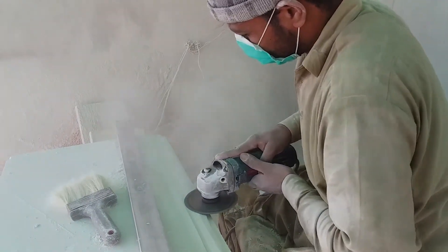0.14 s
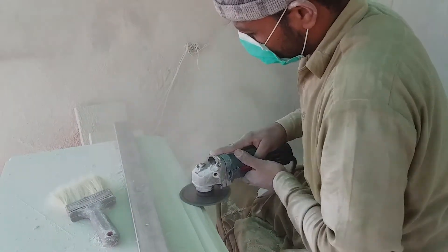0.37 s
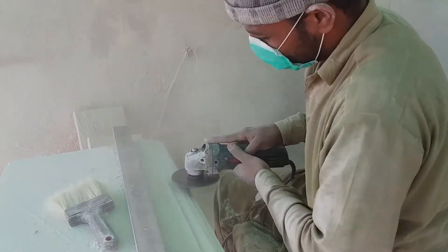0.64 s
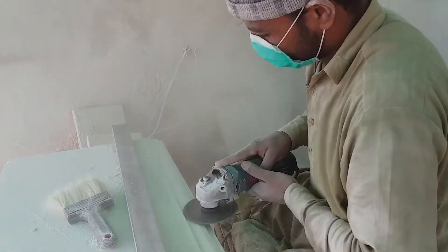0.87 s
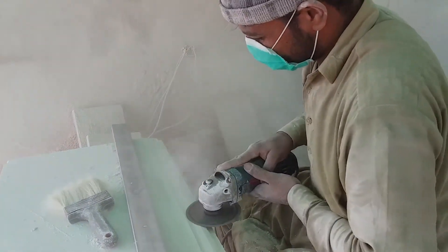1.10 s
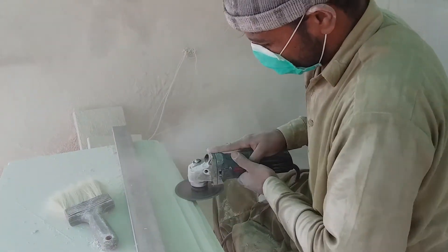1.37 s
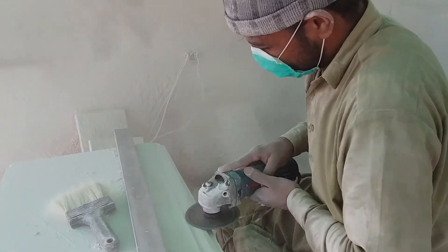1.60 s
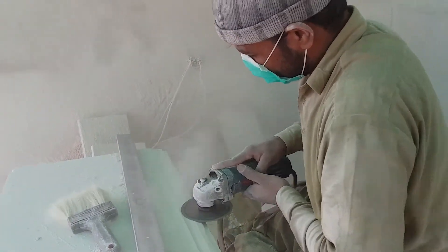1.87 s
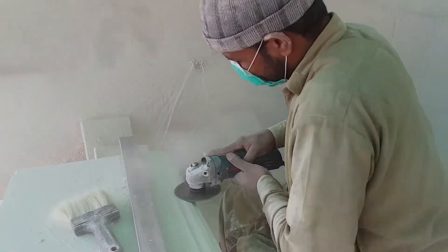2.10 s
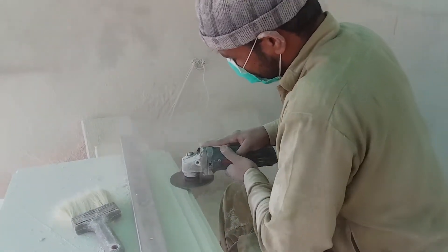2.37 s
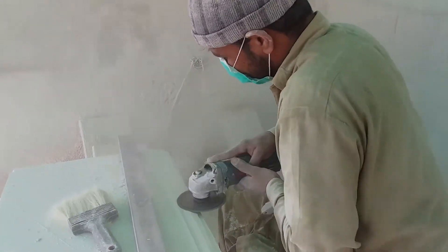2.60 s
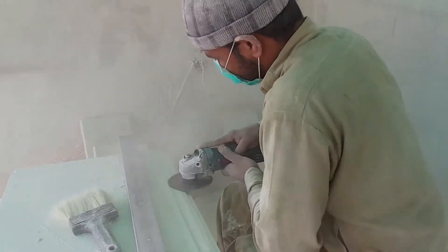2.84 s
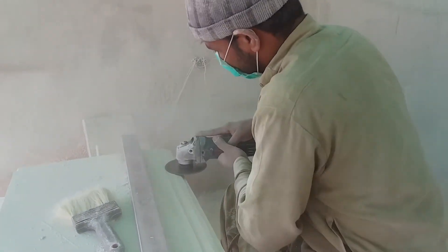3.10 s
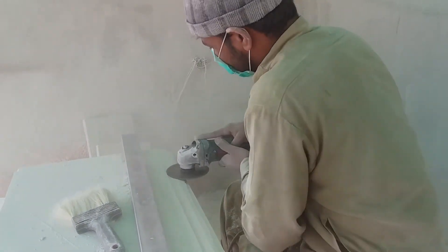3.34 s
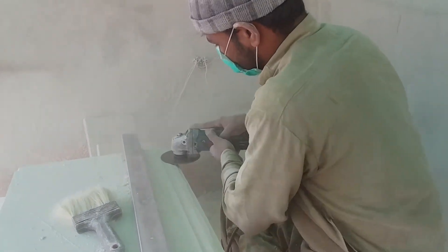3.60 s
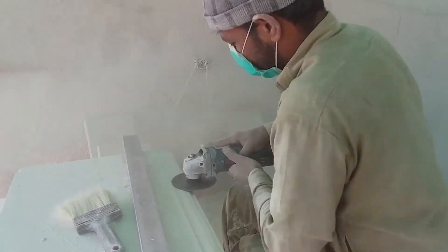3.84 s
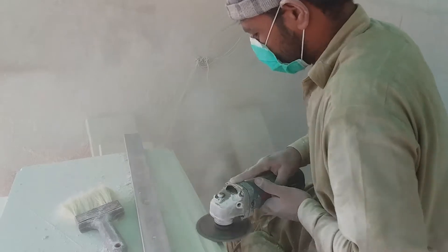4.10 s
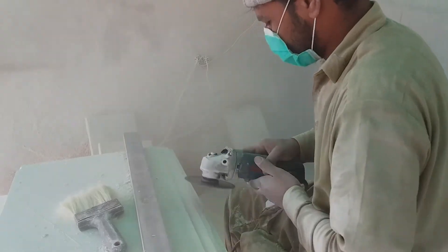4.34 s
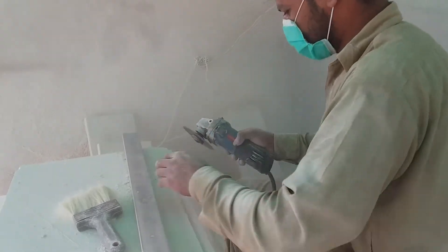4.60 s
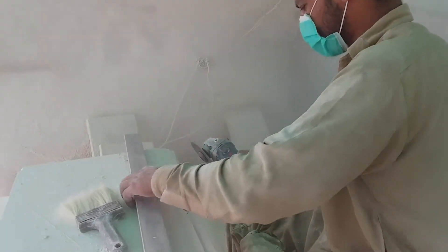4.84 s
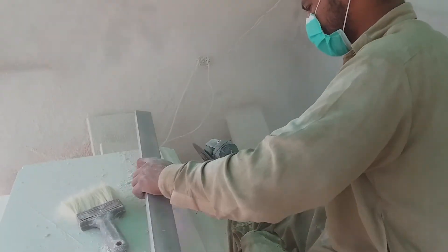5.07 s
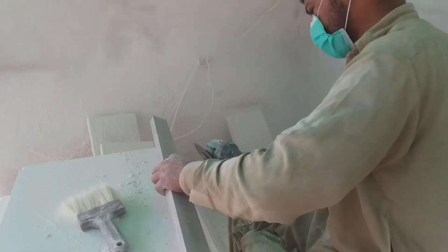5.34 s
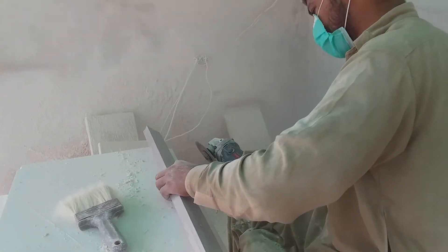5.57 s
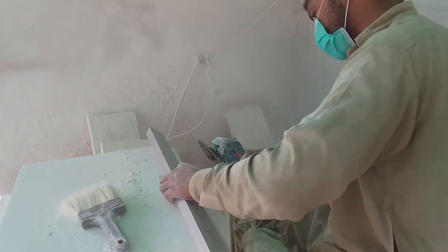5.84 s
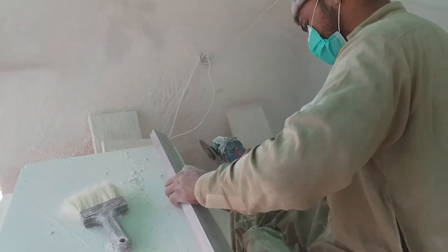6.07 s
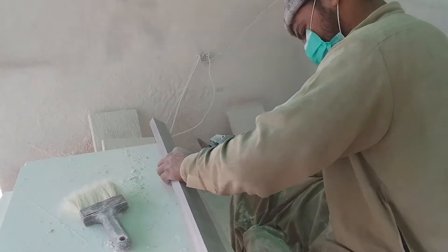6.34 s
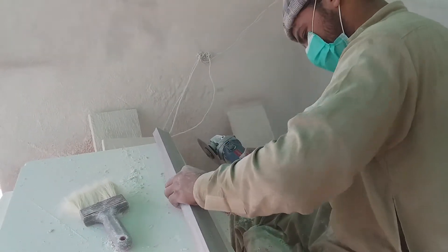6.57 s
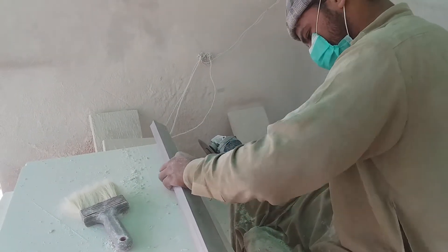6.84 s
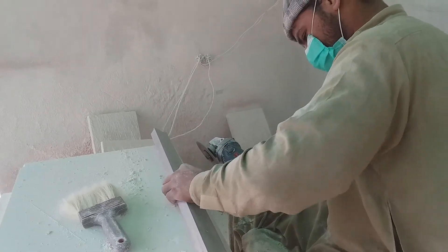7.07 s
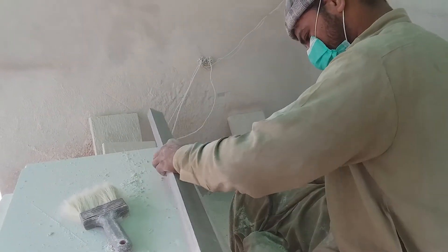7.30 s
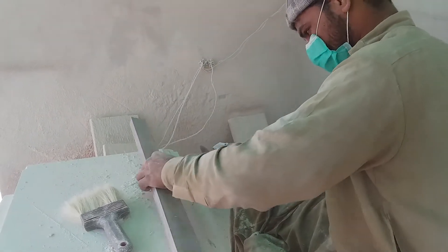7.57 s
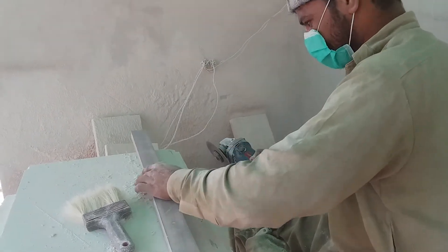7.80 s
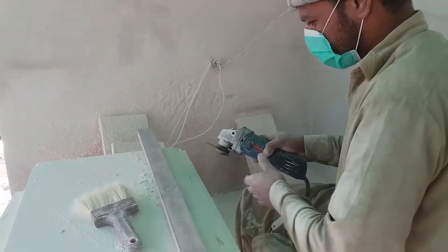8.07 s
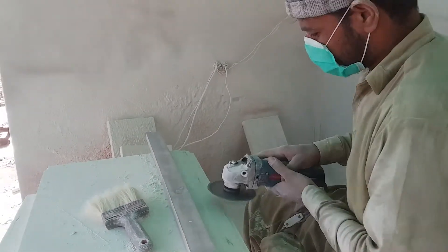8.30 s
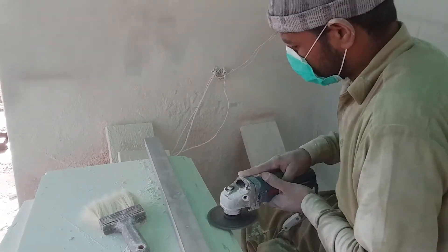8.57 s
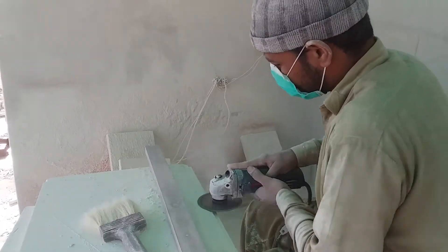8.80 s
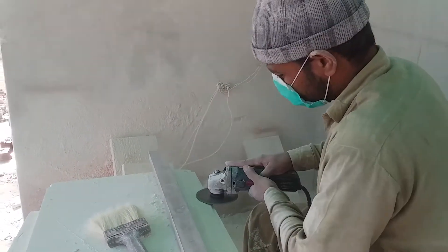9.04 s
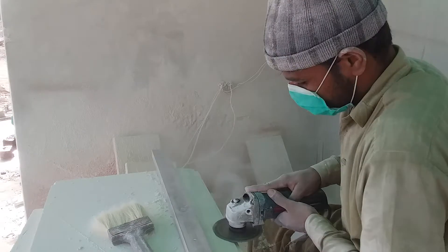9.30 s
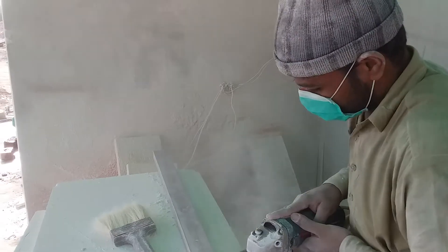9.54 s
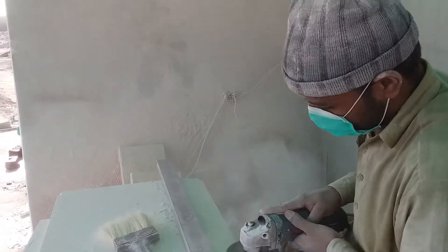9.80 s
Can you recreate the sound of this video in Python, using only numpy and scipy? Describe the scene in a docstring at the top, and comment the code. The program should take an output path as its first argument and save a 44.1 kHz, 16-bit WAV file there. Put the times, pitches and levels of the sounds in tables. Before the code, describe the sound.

A close, centered microphone in a bare workshop hears a handheld angle grinder already biting stone: low rattling slab shake, coarse grit spray, small thuds and a piercing steel-disc ring. The first bite ends about 0.6 s; another runs from 0.95 to 1.4. From 1.65 further passes run together, growing lighter and more whistling after 3, until about 4.15 s. Fan rush and a wavering motor whine continue throughout, rising in pitch as the load lifts. The idle is soft at first, then from about 5.5 s swells clearly louder, with bright hiss, thin high ticks and a faint low rumble. A hollow metal bar knocks dully near 5.6 and drags faintly around 6.3, 7.15 and 7.7, with a small knock at 8.4. At 8.6 the disc bites again, the motor sags in pitch, and harsh, ringing, gritty cutting with thuds lasts until about 9.9.

```python
"""A hand-held angle grinder is already biting a stone slab; it bites again and again, then idles,
heard softly at first and then louder, while a hollow metal bar is shifted, and at last cuts on.
Each bite is noise shaped into slab shake, sprayed grit and the ringing steel disc.
Fan rush (shaped noise) and armature whine (wandering sines) never stop; thin ticks and a low rumble join them.
One microphone stands close by in a bare workshop, so left and right are the same."""
import sys
import numpy as np
from scipy import signal
from scipy.fft import rfft, irfft, next_fast_len
from scipy.io import wavfile
from scipy.ndimage import uniform_filter1d, map_coordinates

SR = 44100
rng = np.random.default_rng(int(sys.argv[2]) if len(sys.argv) > 2 else 0)


def amp(db):
    return 10 ** (np.asarray(db, float) / 20)


def write(x):
    x = np.atleast_2d(x).T
    wavfile.write(sys.argv[1], SR, np.round(np.clip(x, -1, 1) * 32767).astype(np.int16))


N = 437472  # length in samples
T = np.arange(N) / SR  # time in seconds
SIZE = next_fast_len(N)
HZ = np.arange(SIZE // 2 + 1) * SR / SIZE  # frequencies of the spectrum

# How loud the motor noise is heard before load and flutter are added.
# Each row: time in seconds, rush level in dB, hiss level in dB, thin top hiss level in dB.
MOTOR_LEVELS = [(0, -28.5, -28.5, -53), (1.6, -28, -30, -51.5), (2.4, -28.5, -28, -44),
                (4.12, -28, -29, -44), (4.25, -26.5, -26, -48), (4.6, -27.5, -27.5, -51),
                (5.22, -25, -28, -53), (5.5, -20, -21.5, -45.5), (5.62, -16.5, -19, -44.5),
                (5.8, -18, -18.5, -43.5), (6.3, -16.5, -18.5, -43), (7.45, -18.5, -18.5, -44),
                (7.8, -16.5, -18, -44), (8.07, -20.5, -18, -41.5), (8.37, -17, -18, -39.5),
                (8.615, -18, -17, -39), (8.645, -25.5, -26.5, -40.5), (9.8, -28, -28.5, -48.5),
                (9.92, -29, -32, -55)]


def cutting():
    """The rim chatters on the stone: jolts shake the slab, grit sprays, and each disc mode swells on its own."""
    shake_db, ring_db, load_db = passes()
    shake = uniform_filter1d(amp(shake_db + 0.7 * walk(25)), size=200)
    ring = uniform_filter1d(amp(ring_db), size=200)
    # pressing harder adds a little grit; below the lightest contact it fades with the shake
    lightest_spray_db, gain_per_shake_db = -27, 0.24
    spray_db = lightest_spray_db + gain_per_shake_db * np.clip(load_db, 0, None)
    spray_db = spray_db + np.clip(load_db, None, 0) + 0.85 * walk(15)
    spray = uniform_filter1d(amp(spray_db), size=200)
    chatter = walk(35)  # shared by slab and grit
    slab = slab_shake(shake, chatter)
    grit = rng.standard_normal(N) * amp(1.5 * walk(300) + 0.8 * chatter)
    low, high = disc_and_grit(grit, shake, ring)
    return slab + ring * low + spray * high


def passes():
    """Slab shake and disc ring (dB), and how far the shake lies above the lightest contact; silent between passes."""
    # Passes of the disc along the edge, one curve each, before small wavers and trims.
    # Each row: time in seconds, slab shake in dB, disc ring in dB.
    pass_curves = [
        [(0.0, -19, -25), (0.028, -16.5, -17.5), (0.188, -20.5, -17.5), (0.234, -23, -21), (0.274, -21.5, -24),
         (0.316, -22, -19.5), (0.434, -21, -18), (0.554, -37.5, -21), (0.58, -62, -37)],
        [(0.94, -40.5, -30), (1.13, -18.5, -18.5), (1.154, -23, -18.5), (1.232, -18.5, -20), (1.25, -21, -17),
         (1.276, -18.5, -19), (1.344, -29, -18.5), (1.394, -40, -25), (1.43, -62, -45)],
        [(1.65, -49, -41), (1.664, -34.5, -28), (1.802, -22, -20), (1.832, -29, -21), (1.862, -22, -23),
         (1.938, -25.5, -18), (2.014, -21.5, -20), (2.118, -22, -21.5), (2.33, -36, -19)],
        [(2.33, -43.5, -22), (2.516, -26.5, -18.5), (2.662, -26, -21), (2.708, -22.5, -18), (2.742, -19.5, -29),
         (2.788, -26.5, -20), (2.814, -22, -18), (3.028, -33.5, -20), (3.07, -39, -22)],
        [(3.07, -40, -23), (3.252, -32.5, -20.5), (3.298, -38, -19.5), (3.36, -30, -22), (3.724, -36, -18),
         (3.778, -30.5, -19), (4.096, -25.5, -15.5), (4.142, -28, -26), (4.18, -57, -38)],
        [(8.625, -31, -16), (8.667, -25, -13.5), (8.967, -30.5, -17), (9.309, -23.5, -15.5), (9.399, -26, -12),
         (9.449, -19, -20), (9.499, -25.5, -18.5), (9.813, -22, -17.5), (9.92, -52, -24)],
    ]
    lightest_contact_db = -43.5
    curves = [columns(curve, outside=-200) for curve in pass_curves]
    shake_db, ring_db = (np.max(together, axis=0) for together in zip(*curves))
    return shake_db, ring_db, shake_db - lightest_contact_db


def slab_shake(shake, chatter):
    """Uneven jolts pass through the slab's tone colour and a wobble resonance, and single thuds are added."""
    # Tone colour of the shaken slab. Each row: frequency in Hz, relative level in dB per Hz.
    slab_colour = [(15, -52), (30, -17), (76, -1.5), (156, -4.5), (381, -2.5), (493, -1.5), (769, -5),
                   (1500, -9.5), (1950, -13), (3300, -120)]
    # Disc wobble once a turn under load: frequency in Hz, width in Hz, level in dB over the slab noise.
    spindle_wobble = (150, 42, 6.9)
    wobble_hz, wobble_width, wobble_db = spindle_wobble
    jolts = rng.standard_normal(N) * amp(2.4 * walk(160) + 0.7 * chatter)
    wobble = 1 + amp(wobble_db) * np.abs(mode(wobble_hz, wobble_width))
    noise = banded(shaped(jolts, colour(slab_colour) * wobble), 60, 400)
    return amp(-0.5) * shake * noise + thuds(shake)


def thuds(shake):
    """Short damped knocks of the rim on the stone: the marked ones, and lesser ones that follow the shake."""
    # The rim meets the stone or snags in the cut.
    # Each row: start in seconds, level in dB before the decay, thud pitch in Hz.
    marked_touches = [(0.945, -21, 471), (1.229, -9, 240), (1.654, -28, 530), (1.782, -9, 231),
                      (1.958, -14, 353), (2.028, -6, 280), (2.749, -10, 520), (2.799, -15, 303),
                      (8.63, -11.5, 455), (8.83, -26, 323), (9.105, -11, 223), (9.293, -5, 322),
                      (9.341, -18, 202), (9.456, -18, 350), (9.684, -8, 248), (9.8, -14, 460)]
    snags_per_s, loudest_snag_db = 30, 5  # dB over the slab shake
    lowest_hz, highest_hz = 150, 500  # snag pitch
    decay_s = 0.004
    chance = rng.random((int(snags_per_s * N / SR), 3))
    at = (chance[:, 0] * (N - 1)).astype(int)
    snag_gain = shake[at] * amp(loudest_snag_db - 10 * chance[:, 1])
    snag_hz = lowest_hz * (highest_hz / lowest_hz) ** chance[:, 2]
    marked = [(int(s * SR), amp(db), hz) for s, db, hz in marked_touches]
    out, after = np.zeros(N + 1500), T[:1500]
    for i, gain, hz in [*marked, *zip(at, snag_gain, snag_hz)]:
        out[i:i + len(after)] += gain * np.exp(-after / decay_s) * np.sin(2 * np.pi * hz * after)
    return out[:N]


def disc_and_grit(grit, shake, ring):
    """Grit noise rings the disc's modes; hard pressure damps them, which broadens their thin whistles."""
    # Ringing modes of the hot disc, before pressure and cooling change them.
    # Each row: frequency in Hz, width in Hz, relative level in dB.
    disc_modes = [(2340, 80, -10), (2465, 70, 0), (2765, 70, -10.5), (3330, 60, -11.5), (3900, 50, -19),
                  (4280, 50, -11), (5545, 60, -8.5), (6790, 70, -15), (7090, 80, -11), (7800, 40, -19),
                  (8000, 110, -19), (8500, 40, -22), (8870, 90, -18), (9360, 90, -25), (10000, 60, -28),
                  (10590, 90, -22), (10880, 80, -19), (11820, 100, -20), (12500, 86, -21), (12950, 89, -18),
                  (13810, 220, -13), (14330, 60, -17), (14870, 90, -14), (15200, 90, -15)]
    # Tone colour of the sprayed grit. Each row: frequency in Hz, relative level in dB per Hz.
    grit_colour = [(1650, -22), (2800, 2), (3710, 5), (5520, 1), (6420, -40), (7000, 0), (9970, -36),
                   (10600, -8), (14100, -10.5), (15700, 1)]
    # part of a lightly pressed mode that sings on as a wandering tone, and its pitch waver in Hz
    steady_share, steady_waver_hz = 0.65, 12
    spectrum = rfft(grit, SIZE)
    pressure = uniform_filter1d(shake / (shake + 0.54 * ring + 1e-9), size=2000)
    low, middle = np.zeros(N), np.zeros(N)
    high = amp(-26.5) * shaped(grit, colour(grit_colour))
    for hz, width, db in disc_modes:
        free = unit(irfft(spectrum * mode(hz, 0.5 * width), SIZE)[:N])
        damped = unit(irfft(spectrum * mode(hz, 1.6 * width), SIZE)[:N])
        if hz < 7500:
            steady = wavering(hz * T, steady_waver_hz)
            free = np.sqrt(1 - steady_share) * free + np.sqrt(2 * steady_share) * steady
        level = amp(db + walk(9)) * np.sqrt(width * np.pi / SR)
        rung = level * ((1 - pressure) * free + pressure * damped)
        if hz < 3000:
            low = low + rung
        elif hz < 5000:
            middle = middle + rung
        else:
            high = high + rung
    low = banded(low + stiffened(middle), 2300, 2600)
    high = banded(stiffened(high), 11500, 15500)
    return low, high


def stiffened(x):
    """Raise all pitches slightly once the disc has cooled, since cooler steel is stiffer."""
    # The cooled disc: time from which it counts in seconds, pitch factor.
    cooled_disc = (6.0, 1.011)
    from_s, factor = cooled_disc
    # reading the sound faster, counted back from its end, raises the pitch
    place = np.where(T > from_s, N - 1 - (N - 1 - np.arange(N)) * factor, np.arange(N))
    return map_coordinates(x, [place], order=5)


def motor():
    """Fan air rushes through the vents and housing; the armature and gears whine over it."""
    # Tone colour of the fan air. Each row: frequency in Hz, relative level in dB per Hz.
    rush_colour = [(24, -68), (40, -44.5), (552, -17), (610, -11.5), (691, -11.5), (956, -5.5),
                   (1030, -8.5), (1390, -2), (2350, 1.5), (3330, -5), (5780, -8), (8200, -10.5),
                   (10000, -25), (12900, -17), (15700, -22)]
    # Resonances of the housing. Each row: frequency in Hz, width in Hz, level in dB.
    housing_modes = [(470, 50, -3), (1180, 60, 0), (1300, 50, 1), (1415, 60, -4), (1860, 40, -2),
                     (2100, 200, -4), (2350, 90, -4), (2740, 70, -2), (5650, 700, -6), (15000, 50, -3)]
    # Gain under load for rush, hiss and top hiss: dB for each dB of shake above the lightest contact.
    load_gains = (0.27, 0.19, 0.21)
    load_db = uniform_filter1d(np.clip(passes()[2], 0, None), size=1500)
    rush_db, hiss_db, top_db = (db + gain * load_db + 0.7 * walk(12)  # 0.7 dB flutter
                                for db, gain in zip(columns(MOTOR_LEVELS), load_gains))
    resonance = sum(amp(db) * mode(hz, width) for hz, width, db in housing_modes)
    body = colour(rush_colour) * (1 + np.abs(resonance))
    # hiss is more directional than rush, so each range follows how the vents point
    above_3k, above_9k = (HZ ** 6 / (HZ ** 6 + hz ** 6) for hz in (3300., 8500.))
    flutter = amp(0.5 * walk(40))
    rush, hiss, top = (shaped(rng.standard_normal(N) * flutter, body * share)
                       for share in (1 - above_3k, above_3k - above_9k, above_9k))
    rush = banded(rush, 1100, 2200)
    hiss = banded(hiss, 4400, 6700)
    top = banded(top, 9200, 10000)
    return amp(rush_db) * (rush + armature_whine()) + amp(hiss_db) * hiss + amp(top_db) * top


def armature_whine():
    """Wandering sines at multiples of the armature speed, which sags under load."""
    # Each row: time in seconds, armature speed in turns per second, whine level in dB over the rush.
    armature_curve = [(0, 470, -24), (.6, 470, -20), (.93, 500, -20), (1.4, 470, -20), (1.65, 495, -20),
                      (4.15, 545, -24), (4.3, 563, -17), (4.6, 587, -16), (5.0, 605, -16), (5.6, 615, -16),
                      (6.5, 620, -15), (7.6, 619.5, -15), (8.0, 619, -18), (8.6, 619, -16), (8.8, 520, -24),
                      (9.92, 500, -24)]
    # Partials of the whine, gear sidebands among them.
    # Each row: multiple of the armature speed, relative level in dB, pitch waver in Hz.
    whine_partials = [(1, -1, 1.38), (1.285, -5, 7.74), (1.563, -0.5, 6), (1.86, -10, 13),
                      (2.221, -17, 13.7), (2.3, 8, 14), (3.43, 1.5, 14), (3.8, 5, 20), (4.48, 7.5, 12),
                      (4.999, -16, 11.4), (6.14, 4, 18)]
    speed, whine_db = columns(armature_curve)
    turns = np.cumsum(speed) / SR
    partials = sum(amp(db + 2.0 * walk(14)) * wavering(k * turns, waver_hz)
                   for k, db, waver_hz in whine_partials)
    return amp(whine_db) * partials


def bar():
    """Dragging excites the air column of the tube; setting down gives a dull knock."""
    # The hollow bar touches the slab. Each row: start in seconds, level in dB,
    # drag length in seconds, share of air-column tone from 0 to 1.
    bar_touches = [(5.575, -40.5, 0.08, .1), (6.28, -45.5, 0.14, 1), (7.15, -42, 0.12, 1),
                   (7.54, -42, 0.035, .2), (7.675, -34.5, 0.18, 0.8), (8.0, -49, 0.21, 0.8),
                   (8.41, -41, 0.028, 0.2)]
    # Tones of the air column. Each row: frequency in Hz, pitch waver in Hz, relative level in dB.
    tube_tones = [(140, 12, -8), (187, 4, -7), (371.5, 2, 0), (559, 3, -2)]
    # Tone colour of the dull knock. Each row: frequency in Hz, relative level in dB per Hz.
    knock_colour = [(50, -20), (100, 2), (300, 11), (600, -14), (1200, -19)]
    tone = unit(sum(amp(db + 2 * walk(15)) * wavering(hz * T, waver_hz)
                    for hz, waver_hz, db in tube_tones))
    knock = unit(shaped(rng.standard_normal(N), colour(knock_colour)))
    out = np.zeros(N)
    for s, db, drag, share in bar_touches:
        rise = np.clip((T - s) / 0.008, 0, 1)
        fall = np.exp(-np.clip(T - s - drag, 0, 1) / 0.024)
        out += amp(db) * rise * fall * (share * tone + (1 - share) * knock)
    return out


def ticks():
    """Short noisy bursts ringing a pair of high resonances; faint ones come at random."""
    # The loudest thin ticks, high above the rush. Each row: start in seconds, level in dB.
    loud_ticks = [(5.8067, -21.5), (6.4577, -23.5), (6.6218, -24.5), (7.3148, -21), (7.4205, -18),
                  (7.4584, -24.5), (7.4879, -19), (7.9848, -24.5), (8.0366, -23.5), (8.2696, -21.5),
                  (8.3709, -32)]
    # The pair of resonances. Each row: frequency in Hz, width in Hz, relative level in dB.
    tick_modes = [(12600, 900, -10), (13900, 900, 2)]
    faint_per_s, loudest_faint_db, rise_s = 6, -6, 0.0023  # dB over the unloaded rush
    chance = rng.random((int(faint_per_s * N / SR), 2))
    faint_s = chance[:, 0] * T[-1]
    rush_db = np.interp(faint_s, T, columns(MOTOR_LEVELS)[0])
    faint_db = rush_db + loudest_faint_db - 8 * chance[:, 1]
    clicks = np.zeros(N)
    for s, db in [*loud_ticks, *zip(faint_s, faint_db)]:
        clicks[int(s * SR)] += amp(db)
    after = T[:2000] / rise_s
    burst = signal.fftconvolve(clicks, after * np.exp(1 - after))[:N]
    resonances = sum(amp(db) * mode(hz, width) ** 2 for hz, width, db in tick_modes)
    return burst * unit(shaped(rng.standard_normal(N), resonances))


def rumble():
    """Low noise from beyond the workshop, centred on one broad resonance, swells and fades."""
    # Each row: time in seconds, level in dB.
    rumble_curve = [(4.25, -62), (4.6, -75), (5.3, -65), (5.55, -53), (5.75, -59), (6.41, -49), (6.87, -59),
                    (8.3, -57)]
    noise = unit(shaped(rng.standard_normal(N), mode(89.0, 88.0) ** 3))
    return amp(columns(rumble_curve)[0]) * noise


def unit(x):
    """Scale to an average strength (rms) of 1."""
    return x / np.sqrt(np.mean(x ** 2))


def shaped(x, response):
    """Pass a signal through a frequency response."""
    return irfft(rfft(x, SIZE) * response, SIZE)[:N]


def colour(points):
    """Gain of (Hz, dB) points, joined on a log-frequency axis."""
    hz, db = np.transpose(points)
    return amp(np.interp(np.log(HZ + 1), np.log(hz), db))


def mode(hz, width):
    """One damped resonance, gain 1 at its centre."""
    return 1j * HZ * width / (hz ** 2 - HZ ** 2 + 1j * HZ * width)


def banded(x, lo_hz, hi_hz):
    """Scale the whole signal so that the given band has rms 1."""
    return x / np.std(shaped(x, (HZ > lo_hz) & (HZ < hi_hz)))


def walk(rate):
    """A smooth random wander: levels held for 1 / rate seconds and averaged twice, with rms about 1."""
    k = int(SR / rate)
    held = np.repeat(rng.standard_normal(N // k + 1), k)
    return unit(uniform_filter1d(uniform_filter1d(held, k), k)[:N])


def wavering(turns, waver_hz):
    """A sine on the given phase (in turns) whose pitch wanders by a few Hz."""
    return np.sin(2 * np.pi * (turns + np.cumsum(waver_hz * walk(30)) / SR))


def columns(table, outside=None):
    """Every column of a curve, sample by sample."""
    s, *values = np.transpose(table)
    return [np.interp(T, s, v, outside, outside) for v in values]


def scene():
    """All sources reach the one microphone."""
    return np.tile(cutting() + motor() + bar() + ticks() + rumble(), (2, 1))


def roll_off(x):
    """The treble ends steeply here."""
    return signal.sosfilt(signal.butter(12, 16870, fs=SR, output="sos"), x)


def record(dry):
    """The microphone loses the lowest bass; the input stage rounds the tallest peaks and cuts the top."""
    mic_low_hz, top_hz = 45.2, 15750
    bass_cut = signal.butter(2, mic_low_hz, "high", fs=SR, output="sos")
    heard = signal.sosfilt(bass_cut, dry)
    rounded = heard / (1 + np.abs(heard) ** 6) ** (1 / 6)
    top_cut = signal.ellip(12, 0.2, 80, top_hz, fs=SR, output="sos")
    finished = signal.sosfilt(top_cut, rounded)
    return roll_off(finished)


dry = scene()
out = record(dry)
write(out)
```